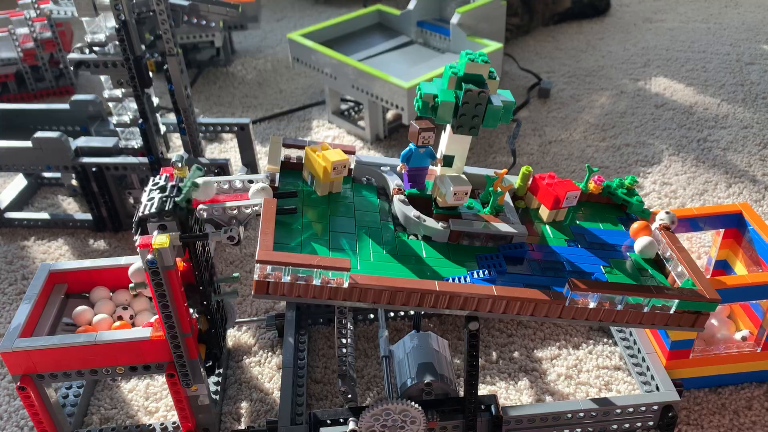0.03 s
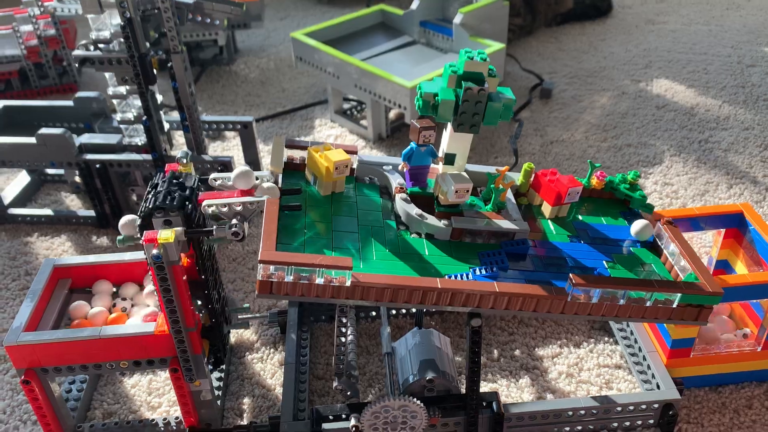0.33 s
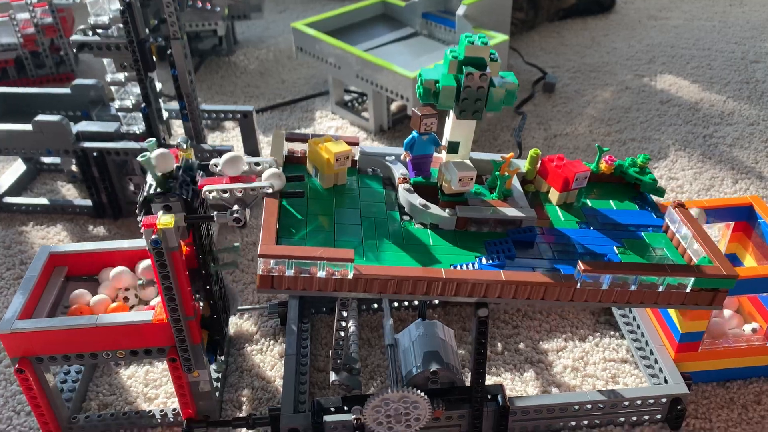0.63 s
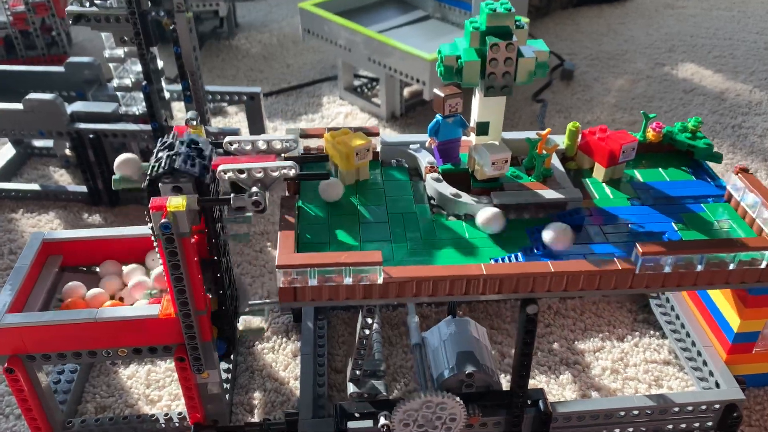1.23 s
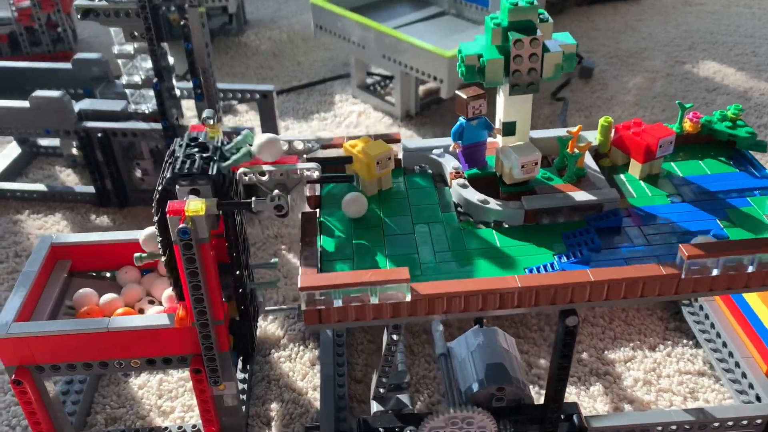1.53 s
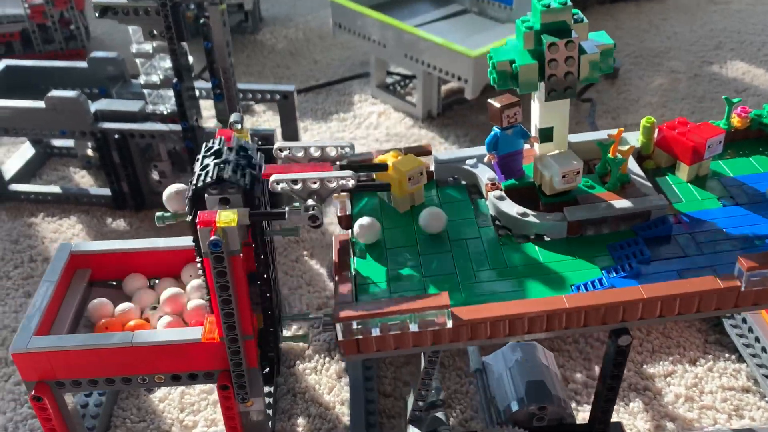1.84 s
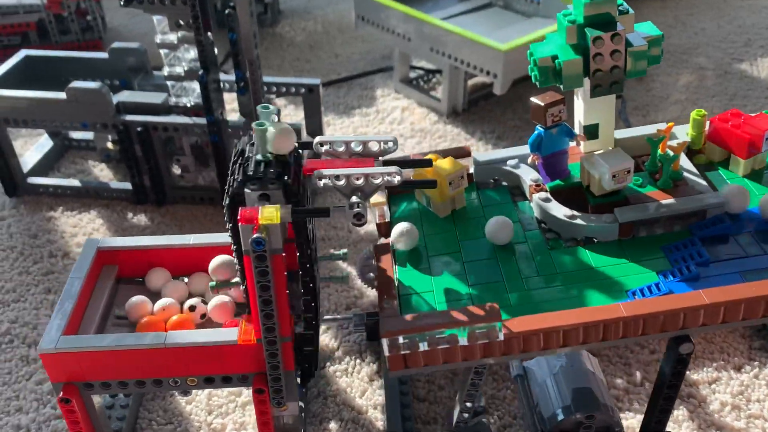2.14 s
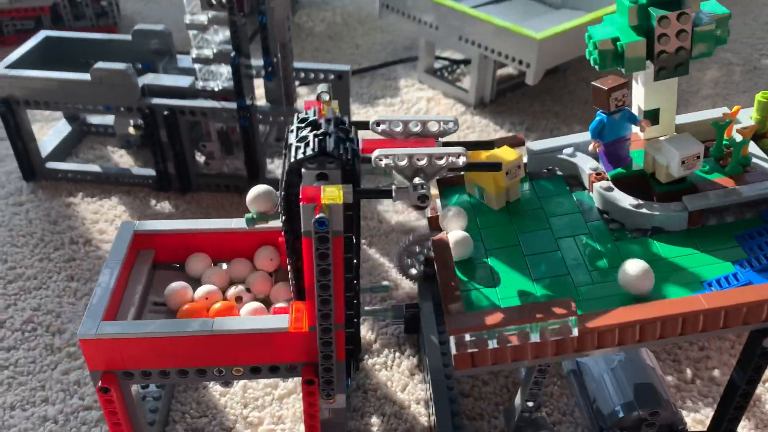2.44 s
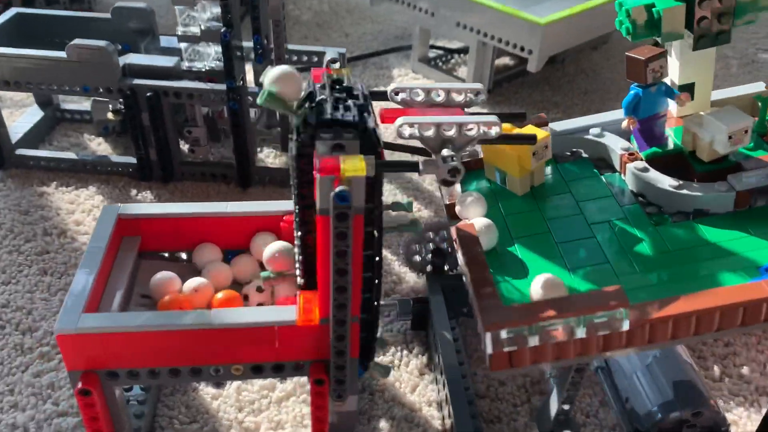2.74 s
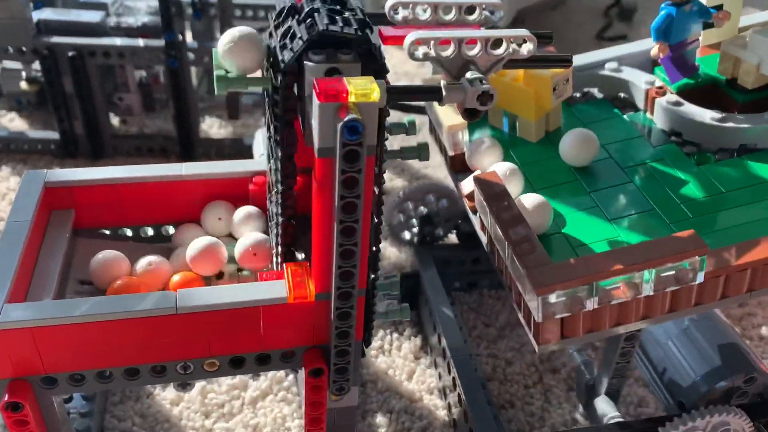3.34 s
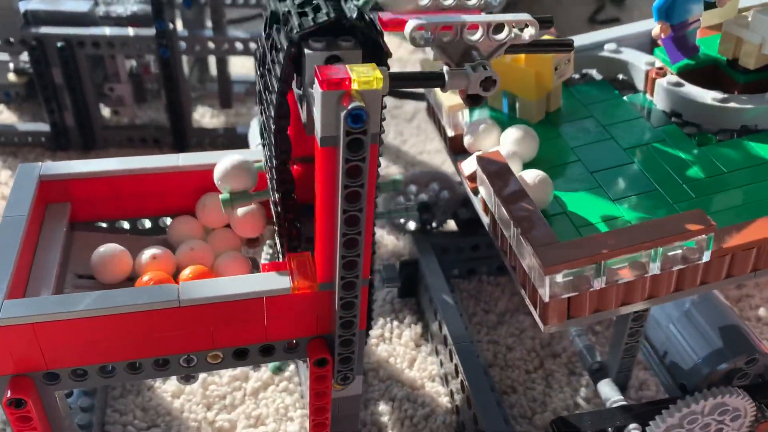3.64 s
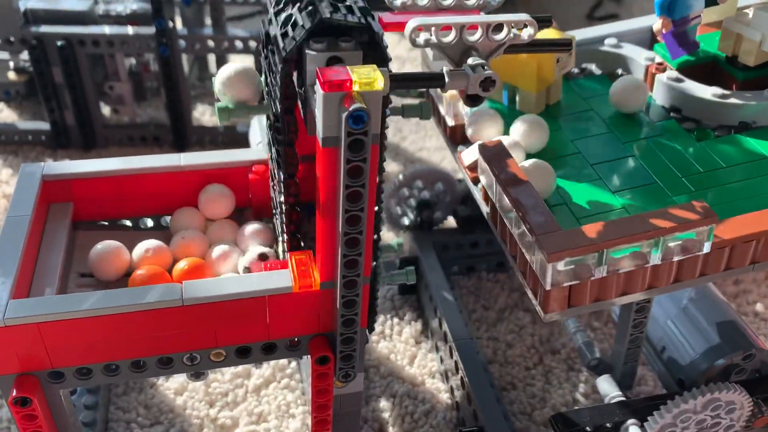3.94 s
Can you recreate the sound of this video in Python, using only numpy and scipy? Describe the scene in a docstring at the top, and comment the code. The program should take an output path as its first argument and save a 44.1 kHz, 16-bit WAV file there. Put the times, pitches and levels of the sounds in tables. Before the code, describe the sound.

A plastic brick machine rattles and ticks while balls knock into a bin and tray.

```python
"""Plastic balls drop into a bin, land on a tilting tray and clack together in a motorised brick machine.
Each impact excites the damped modes of the struck part, and a small furnished room answers briefly.
Beneath them balls roll over plate seams, a lift chain rustles and snaps, a gear ticks periodically
over a chatter of teeth, and the motor hums. The machine stands on a carpet, close to a phone."""
import sys
import numpy as np
from scipy import signal
from scipy.fft import rfft, irfft
from scipy.io import wavfile
from scipy.ndimage import uniform_filter1d

SR = 44100
rng = np.random.default_rng(int(sys.argv[2]) if len(sys.argv) > 2 else 0)


def master(y):
    """Save y as 16-bit WAV."""
    cut = np.clip(np.atleast_2d(y).T, -1, 1)
    pcm = np.round(cut * 32767)  # scale
    wavfile.write(sys.argv[1], SR, pcm.astype(np.int16))


N = 176400
CONTACT_S, RISE_S = .001, .00038  # onset delay of snaps and knocks; rise time of a contact


def amp(db):
    """Decibels as an amplitude ratio."""
    return 10 ** (np.asarray(db) / 20)


def unit(x):
    """Normalisation to rms 1."""
    return x / np.sqrt(np.mean(x ** 2))


def unit_energy(x):
    """Normalisation to a mean energy of 1 per row."""
    return unit(x) / np.sqrt(x.shape[-1])


def envelope(rows):
    """Amplitude envelope interpolated from (time [s], level [dB])."""
    return amp(np.interp(np.arange(N) / SR, *np.array(rows).T))


def drift(rate_hz):
    """Random modulation: smoothed stepwise noise at rms 1."""
    hold = int(SR / rate_hz)
    steps = np.repeat(rng.standard_normal(N // hold + 1), hold)
    return unit(uniform_filter1d(uniform_filter1d(steps, hold), hold)[:N])


def convolve(x, impulse):
    """Linear filtering of each row, keeping its length."""
    return signal.fftconvolve(x, np.atleast_2d(impulse), axes=1)[:, :x.shape[1]]


def response(spectrum, size=4096):
    """Minimum-phase impulse response for (frequency [Hz], gain [dB])."""
    hz, db = np.array(spectrum, float).T
    f = np.arange(size // 2 + 1) * SR / size
    gain = amp(np.interp(np.log(f + 1), np.log(hz), db))
    cepstrum = irfft(np.log(gain))
    cepstrum[1:size // 2] *= 2
    cepstrum[size // 2 + 1:] = 0
    return irfft(np.exp(rfft(cepstrum)))[:size // 2]


def colour(x, spectrum):
    """Spectral shaping, normalised to rms 1."""
    return unit(convolve(x, response(spectrum)))


def add(out, start_s, sound):
    """Superposition of a sound at a given time."""
    part = out[:, max(int(start_s * SR), 0):][:, :sound.shape[1]]
    part += sound[:, :part.shape[1]]


def buzz(decay_s, size=2048):
    """Exponentially damped noise of loose plastic joints, as mid and side."""
    t = np.arange(size) / SR
    noise = rng.standard_normal((2, size))
    return unit_energy(noise * (1 - np.exp(-t / RISE_S)) * np.exp(-t / decay_s))


def rattle(per_s, skew_db, decay_s):
    """Shot noise: contacts arrive at random, and their decaying energies add."""
    contacts = rng.random(N) < per_s / SR
    sizes = contacts * amp(skew_db * np.minimum(rng.exponential(size=N), 4)) * rng.random(N)
    energy = signal.lfilter([1], [1, -np.exp(-2 / (decay_s * SR))], sizes ** 2 + 1e-12)
    return np.sqrt(energy) * rng.standard_normal((2, N))


GEAR_HZ = 22.52
# Frame vibration (frequency [Hz], relative level [dB])
RUMBLE_SPECTRUM = [(20, -33), (43, -4), (70, -1.5), (100, -4), (150, 3), (205, -11), (280, -6.5), (420, -6),
                   (800, -14), (2000, -45)]
# Hum partials (order [multiple of GEAR_HZ])
HUM_ORDERS = [6, 18, 31.5, 39, 78]
# Strength of each partial (level [dB])
HUM_LEVELS = [-66, -54, -61.5, -59, -57.5]


def motor():
    """Forced vibration: rotational orders waver with the load, over the frame's slowly growing rumble."""
    speed_hz = GEAR_HZ * (1 + .00217 * drift(9))
    turns = np.cumsum(speed_hz) / SR
    rise_db = (np.arange(N) - N / 2) / SR  # 1 dB per second
    out = colour(rng.standard_normal((2, N)), RUMBLE_SPECTRUM) * amp(-51.5 + 1.6 * drift(11) + rise_db)
    for order, db in zip(HUM_ORDERS, HUM_LEVELS):
        out[0] += amp(db + 2.5 * drift(15)) * unit(np.sin(2 * np.pi * order * turns))
    return out


def link_click(ring_hz=9750, decay_s=.001, size=512):
    """Impulse excitation: a small hard contact cracks and rings, at a slightly different pitch each time."""
    t = np.arange(size) / SR
    hz = ring_hz * (1 + .03 * rng.standard_normal())
    phase = rng.random((2, 1))
    ring = np.sin(2 * np.pi * (hz * t + phase)) * (1 - np.exp(-t / RISE_S)) * np.exp(-t / decay_s)
    return unit_energy(buzz(decay_s, size) + amp(-5) * unit_energy(ring))


def rebounds(mean_gap_s=.0019, loss_db=3.5):
    """Inelastic rebound: a slack part strikes three times at uneven gaps, on average weaker each time."""
    out, start = np.zeros((2, 2048)), 0
    for k in range(3):
        add(out, start, amp(-k * loss_db + 3 * rng.standard_normal()) * link_click())
        start += mean_gap_s * rng.exponential()
    return out


# Catches in one revolution (position [turns], relative level [dB])
GEAR_CATCHES = [(0.0, -2.5), (.39, -9), (0.959, -4)]
# Filter for gear ticks and chain snaps (frequency [Hz], gain [dB])
TICK_SPECTRUM = [(500, -30), (1500, -2), (4000, -15.5), (7000, 1), (9600, -2), (11000, 2.5), (13500, -0.5),
                 (16000, -13.5)]
# Tooth chatter (frequency [Hz], relative level [dB])
MESH_SPECTRUM = [(300, -21.5), (1000, -12), (1650, 1.5), (2800, -16.5), (4200, -3), (5900, 2), (7200, 2.5),
                 (8500, 1), (9500, 3.5), (10700, 4), (11600, -10), (13000, -1.5), (15700, -12)]
# Course of the chatter (time [s], level [dB])
MESH_ENVELOPE = [(0, -37.5), (.6, -35.5), (1.2, -34.5), (1.7, -34), (2.1, -32.5), (2.7, -34), (3.3, -34),
                 (4, -33.5)]


def gears(first_tick_s=.0012, jitter_s=.0008):
    """Periodic impacts: the gear catches at the same places in each turn, over random tooth chatter."""
    ticks = np.zeros((2, N))
    for turn in range(int(N / SR * GEAR_HZ) + 1):
        for position, db in GEAR_CATCHES:
            start = first_tick_s + (turn + position) / GEAR_HZ + jitter_s * rng.standard_normal()
            add(ticks, start, amp(db) * rebounds())
    chatter = colour(rattle(per_s=4500, skew_db=2.5, decay_s=.0011), MESH_SPECTRUM)
    chatter *= envelope(MESH_ENVELOPE) * amp(.95 * drift(25.56))
    return amp(-37.5) * colour(ticks, TICK_SPECTRUM) + chatter


# Links snapping over (time [s], relative level [dB])
LINK_SNAPS = [(0.444,-11.5), (0.515,-17), (0.667,-25), (1.1548,-18), (1.2442,-17), (1.289,-18), (1.333,-11),
              (1.3773,-10), (1.439,-12), (1.4656,-15), (1.500,-15), (1.511,-18), (1.643,-16), (1.933,-14),
              (2.032,-12), (2.577,-10.5), (2.93,-11), (2.947,-12), (2.9771,-9.5), (3.375,-7), (3.4657,-19),
              (3.6861,-8)]
# Chain rustle (frequency [Hz], relative level [dB])
RUSTLE_SPECTRUM = [(800, -12), (2000, -19), (3000, -6.5), (3900, 2.5), (5000, -1.5), (6200, 2.5),
                   (8000, -5), (14000, -11)]
# Course of the rustle (time [s], level [dB])
RUSTLE_ENVELOPE = [(0, -44), (.7, -45), (1.3, -41), (1.7, -43), (2.05, -39.5), (2.3, -43.5), (2.55, -36),
                   (2.8, -40.5), (3.3, -34), (3.7, -38.5), (3.93, -37)]
# Filter for the sharp click clusters (frequency [Hz], gain [dB])
CLUSTER_SPECTRUM = [(2000, -12), (6000, -7), (9500, 3), (13000, 3), (16000, -5.5)]


def chain(clusters_per_s=22):
    """Contact noise of the lift chain: dense contacts fuse into a rustle; clicks and snaps stand out."""
    snaps, clusters = np.zeros((2, N)), np.zeros((2, N))
    for start, db in LINK_SNAPS:
        add(snaps, start + CONTACT_S, amp(db + 6.5) * link_click())
    snaps = convolve(snaps, unit_energy(response(TICK_SPECTRUM)))
    rustle = colour(rattle(per_s=220, skew_db=-2.5, decay_s=.0087), RUSTLE_SPECTRUM)
    for slot in range(int(N / SR * clusters_per_s)):
        start = (slot + 2 * rng.random()) / clusters_per_s
        add(clusters, start, amp(rng.standard_normal()) * rebounds())
    return rustle * envelope(RUSTLE_ENVELOPE) + amp(-46) * colour(clusters, CLUSTER_SPECTRUM) + snaps


# Balls rolling on studs and plates (frequency [Hz], relative level [dB])
ROLL_SPECTRUM = [(200, -27), (450, -4.5), (800, -2), (1200, 2.5), (1700, -1.5), (2500, 2), (4000, -8),
                 (9000, -41)]
# Course of the rolling (time [s], relative level [dB])
ROLL_ENVELOPE = [(0.05, -41), (0.1, -43.5), (0.26, -53), (0.47, -54), (0.75, -56), (0.9, -54),
                 (1.09, -46.5), (1.55, -50), (1.78, -48), (1.94, -47), (2.44, -44.5), (2.77, -50),
                 (3.14, -53), (3.35, -48), (3.76, -52.5), (4.0, -47)]


def rolling():
    """Roughness excitation: balls bump at random over the seams of the plates."""
    bumps = rattle(per_s=350, skew_db=0, decay_s=.012)
    return amp(6.5) * colour(bumps, ROLL_SPECTRUM) * envelope(ROLL_ENVELOPE)


# Balls touching (time [s], frequency [Hz], relative level [dB])
BALL_PINGS = [(0.838, 5820, -15.5), (0.838, 4400, -20.5), (1.933, 2360, -22.5), (1.991, 5220, -27),
              (2.035, 2610, -23), (2.084, 2640, -18), (2.129, 2780, -24.5), (2.261, 2600, -27),
              (2.301, 2250, -15.5), (2.503, 3900, -22.5), (2.522, 3850, -27), (3.913, 4100, -23)]
# Hard contact, in pings and clacks (frequency [Hz], gain [dB])
CONTACT_SPECTRUM = [(200, -26), (450, -1.5), (1500, -11), (2400, -5.5), (3300, -8), (4700, 1), (6200, -6),
                    (7600, 1.5), (10000, -6), (15000, -14.5)]


def pings(decay_s=.0035):
    """Damped resonance: hollow balls click and ring, amplitude-modulated as they chatter together."""
    out, t = np.zeros((2, N)), np.arange(SR // 10) / SR
    body = unit_energy(response(CONTACT_SPECTRUM))
    for start, hz, db in BALL_PINGS:
        chatter = 1 + .9 * drift(1200)[:len(t)]
        ring = chatter * np.sin(2 * np.pi * hz * t) * (1 - np.exp(-t / RISE_S)) * np.exp(-t / decay_s)
        click = convolve(buzz(decay_s=.0048, size=len(t)), body)
        add(out, start, amp(db) * (np.outer([1, .4], ring) + amp(12.5) * click))
    return out


# Reflections of the furnished room (frequency [Hz], gain [dB])
ROOM_SPECTRUM = [(200, 0), (900, -4), (2500, 0.5), (6000, -6), (14000, -18)]


def room(direct, tail_db, t60_s=.22, delay_s=.0073):
    """Reverberation: a diffuse, exponentially decaying tail follows the direct sound."""
    t = np.arange(SR // 4) / SR
    tail = rng.standard_normal((2, len(t))) * np.exp(-np.log(1000) * t / t60_s) * (t > delay_s)
    tail = convolve(unit_energy(tail), response(ROOM_SPECTRUM))
    return direct + amp(tail_db) * convolve(direct, tail)


def knocks(blows, spectrum, modes, gain_db, push_db, push_hz, buzz_hz, buzz_s, ring_db):
    """Modal response: a low-passed push and a buzz of joints drive the body and modes of a part."""
    out, t = np.zeros((2, N)), np.arange(SR // 4) / SR
    ring = sum(amp(db) * np.cos(2 * np.pi * hz * t) * np.exp(-np.log(1000) * t / t60)
               for hz, db, t60 in modes)
    body = unit_energy(response(spectrum))
    part = amp(ring_db) * unit_energy(ring)
    part[:len(body)] += body
    impulse = signal.unit_impulse(len(t), int(RISE_S * SR))
    push = amp(push_db) * signal.lfilter(*signal.butter(1, push_hz, fs=SR), impulse)
    highpass = signal.butter(2, buzz_hz, 'high', fs=SR)
    for start, db, presence_db, treble_db in blows:
        force = buzz(buzz_s, size=len(t))
        force[0] = push + signal.lfilter(*highpass, force[0])  # the side keeps its full-band buzz
        knock = convolve(force, part)
        knock *= amp(db + gain_db) / np.linalg.norm(knock, axis=1, keepdims=True)
        brightness = response([(1300, .0053), (2500, presence_db), (6000, treble_db)], size=256)
        add(out, start + CONTACT_S, convolve(knock, brightness))
    return out


# Hard collisions (time [s], relative level [dB], presence [dB], treble [dB])
CLACK_BLOWS = [(0.8371,-13.5,-1,-3), (1.9327,-14,-18,-8), (2.044,-17,-3,-16), (2.2932,-12.5,4,-16),
               (2.2999,-5.5,-13,-4), (2.838,-26,-2,4), (2.844,-19,3,3.5), (3.1973,-22.5,4,5),
               (3.2025,-22,0,-3), (3.5557,-16,0.5,0.5), (3.9139,-22,10,-1)]
# Modes of the colliding parts (frequency [Hz], relative level [dB], T60 [s])
CLACK_RESONANCES = [(1360, -10, 0.02), (2390, -5.5, 0.022), (3910, 6.5, 0.034), (4400, -7, 0.025),
                    (5590, -8, 0.018), (6350, 9, 0.02)]


def clacks():
    """Hard impact: balls and lift parts collide, exciting high, quickly damped modes."""
    direct = knocks(CLACK_BLOWS, CONTACT_SPECTRUM, CLACK_RESONANCES, gain_db=19,
                    push_db=-15.5, push_hz=5000, buzz_hz=500, buzz_s=.0048, ring_db=1)
    return room(direct, tail_db=-5.5)


# Balls falling into the bin (time [s], relative level [dB], presence [dB], treble [dB])
BIN_BLOWS = [(0.065,-22,4,4), (0.108,-16.5,-6,-1), (0.1215,-8.5,2,1), (0.135,-9.5,-2.5,-3),
             (0.140,-16,-11,-3), (0.149,-14,-3,-3), (0.171,-21,2,-7), (0.232,-4,-1.5,-1.5),
             (0.243,-21,-4,6), (0.274,-20,9,2), (0.2975,-7.5,2.5,4), (0.398,-19.5,6,4), (0.426,-19.5,3,2),
             (0.565,-22,5.5,8), (0.695,-24,2,12), (0.701,-9.5,-6.5,4.5), (0.708,-14,4,6), (0.745,-19,1,8),
             (0.765,-14.5,-6,1)]
# Body response of the bin (frequency [Hz], gain [dB])
BIN_SPECTRUM = [(150, -38), (480, -19.5), (700, 8.5), (950, 9.5), (1600, 0.5), (2500, 3.5), (4200, -4),
                (6500, -15), (10000, -5), (15000, -22)]
# Modes of the bin (frequency [Hz], relative level [dB], T60 [s])
BIN_RESONANCES = [(695, 3, 0.13), (880, -8, 0.1), (970, -6, 0.081), (1230, -8, .08), (2467, 10, .04),
                  (2700, -11, .035), (3650, 0, .03)]


def bin_drops():
    """Impact excitation: falling balls set the bin ringing at its natural frequencies."""
    direct = knocks(BIN_BLOWS, BIN_SPECTRUM, BIN_RESONANCES, gain_db=14.5,
                    push_db=-.5, push_hz=2000, buzz_hz=1440, buzz_s=.0045, ring_db=-16)
    return room(direct, tail_db=-3.5)


# Balls landing on the tray (time [s], relative level [dB], presence [dB], treble [dB])
TRAY_BLOWS = [(0.853,-17.5,-5,-5), (0.884,-10.5,-7,2), (0.890,-14,3,1.5), (0.897,-13,4,-15),
              (0.959,-21,5,6.5), (1.003,-11,-2,1.5), (1.138,-24,-9,-16), (1.207,-19.5,4,-19),
              (1.247,-19,6.5,-17), (1.329,-19.5,4.5,-13), (1.753,-5.5,-6.5,-1.5), (2.2995,-16.5,9,1),
              (2.370,-13.5,5.5,0), (2.407,-15,0,3), (2.416,-19.5,1,-1), (2.613,-25.5,5,-4),
              (2.622,-19,5.5,-11), (3.213,-4.5,-2,-1.5), (3.235,-21,4,10), (3.833,-6,0.5,-2),
              (3.876,-15.5,-8,-10)]
# Body response of the tray (frequency [Hz], gain [dB])
TRAY_SPECTRUM = [(120, -29), (240, -27), (320, 0), (750, 1), (1100, 8), (1700, -6), (2700, -2.5),
                 (4500, -10), (7000, -6.5), (9500, -8), (15000, -15)]
# Modes of the tray (frequency [Hz], relative level [dB], T60 [s])
TRAY_RESONANCES = [(330, -9, 0.1), (436, -9, 0.12), (520, -5, 0.13), (732, 10, 0.048), (1018, 7, 0.063),
                   (1160, 4, 0.076), (1230, -4, 0.059), (1510, 0, 0.12), (2420, 2, .05), (2680, -3, 0.06),
                   (3100, -26, 0.067)]


def tray_drops():
    """Free vibration: the modes of the tilting tray die away after each ball lands."""
    direct = knocks(TRAY_BLOWS, TRAY_SPECTRUM, TRAY_RESONANCES, gain_db=16.5,
                    push_db=-4, push_hz=2440, buzz_hz=1700, buzz_s=.0067, ring_db=-14.5)
    return room(direct, tail_db=-5)


# Stereo width (frequency [Hz], side-to-mid gain [dB])
STEREO_WIDTH = [(40, 2), (130, -12), (400, -15), (900, -9.5), (1600, -5), (2800, 1), (4300, -4.5),
                (6000, 3.5), (8000, -1)]
# Right-channel emphasis (frequency [Hz], gain [dB])
RIGHT_EMPHASIS = [(100, 1.1), (700, 0), (1400, -.5), (2500, 1.5), (4000, 1.5), (5800, 3.5), (7200, 1)]


def scene():
    """Mid-side stereophony: the summed sources spread to left and right; the treble leans right."""
    mix = motor() + gears() + chain() + rolling() + pings() + bin_drops() + tray_drops() + clacks()
    hz, width_db = np.array(STEREO_WIDTH).T
    mid_db = -10 * np.log10(1 + amp(width_db) ** 2)  # mid and side power gains sum to 1
    mid = convolve(mix[:1], response(np.column_stack([hz, mid_db])))
    side = convolve(mix[1:], response(np.column_stack([hz, mid_db + width_db])))
    return np.vstack([mid + side, convolve(mid - side, response(RIGHT_EMPHASIS))])


def record(dry):
    """Crosstalk and band limiting: one phone port feeds treble to both channels; the top is cut."""
    merge_hz, merge_width_hz, port_lag_s = 7200, 2400, .000213
    notch_hz, notch_width_hz, top_hz = 11750, 1000, 15800
    f, t = np.arange(N // 2 + 1) * SR / N, np.arange(N) / SR
    left, right = rfft(dry)
    shared_power = .8 * np.clip((f - merge_hz) / merge_width_hz + .5, 0, 1)
    late_right = right * np.exp(-2j * np.pi * f * port_lag_s)
    left = np.sqrt(1 - shared_power) * left + np.sqrt(shared_power) * late_right
    out = irfft(np.array([left, right]), N) * (t > .036)  # opens with a moment of silence
    out = signal.lfilter(*signal.iirnotch(notch_hz, notch_hz / notch_width_hz, fs=SR), out)
    return signal.sosfilt(signal.ellip(10, .2, 80, top_hz, fs=SR, output="sos"), out)


dry = scene()
out = record(dry)
master(out)
```